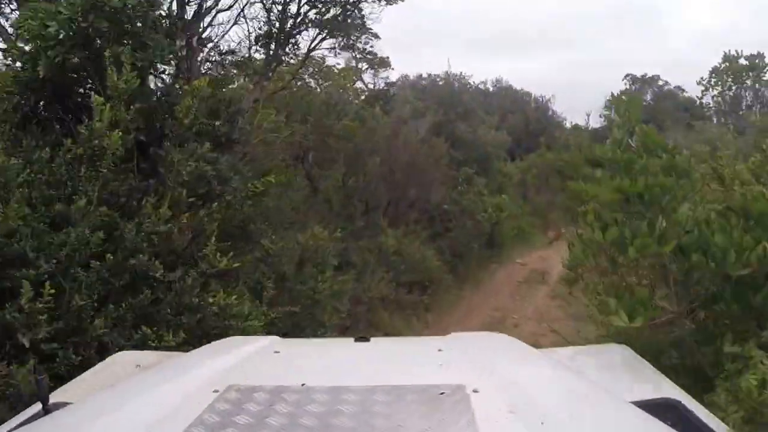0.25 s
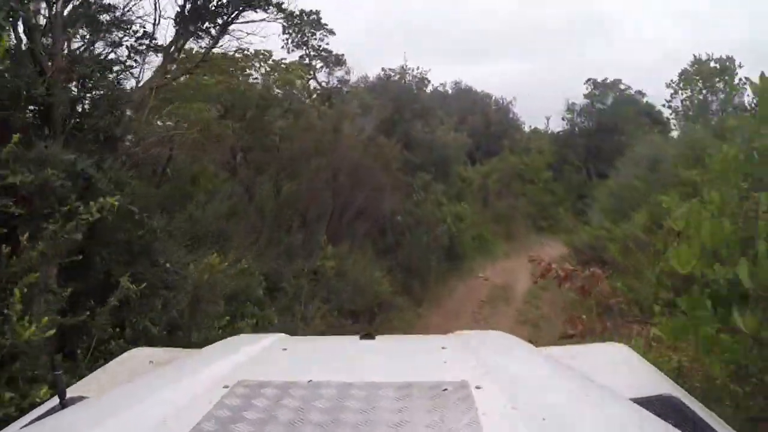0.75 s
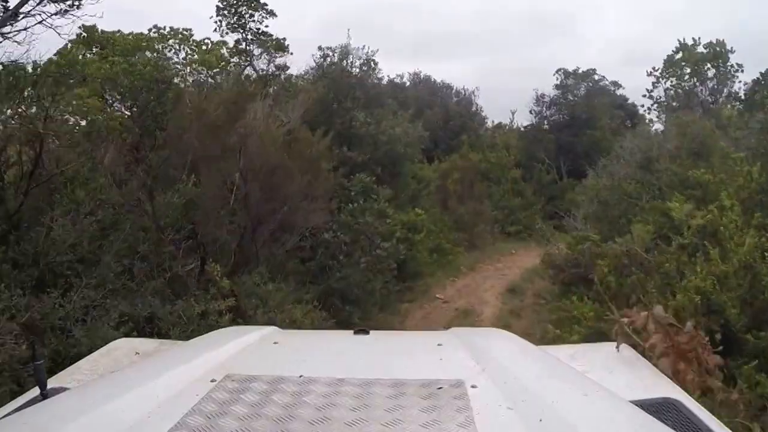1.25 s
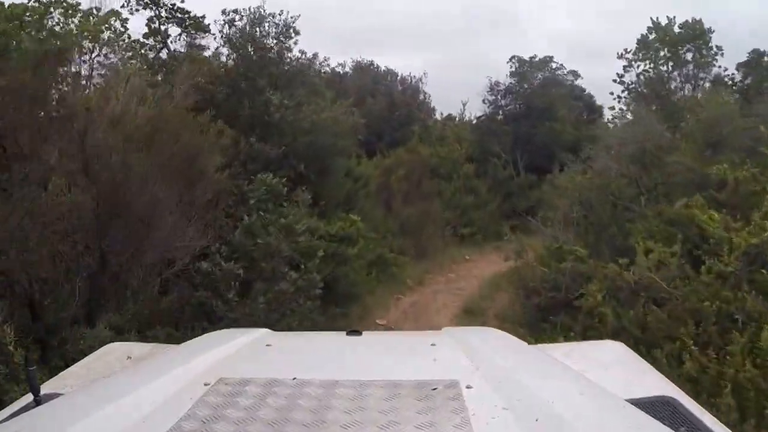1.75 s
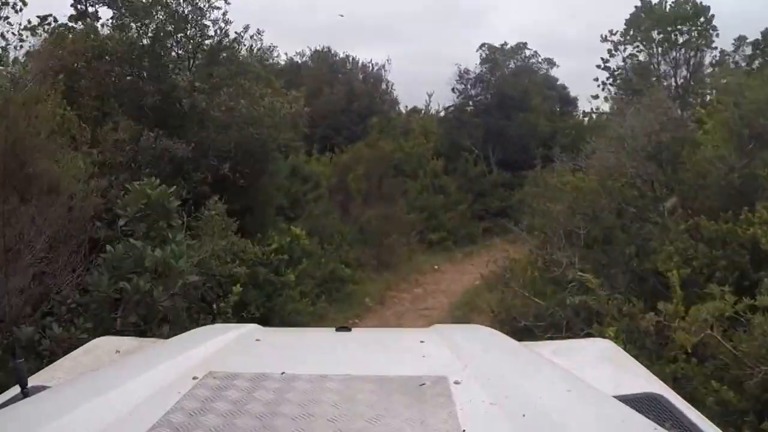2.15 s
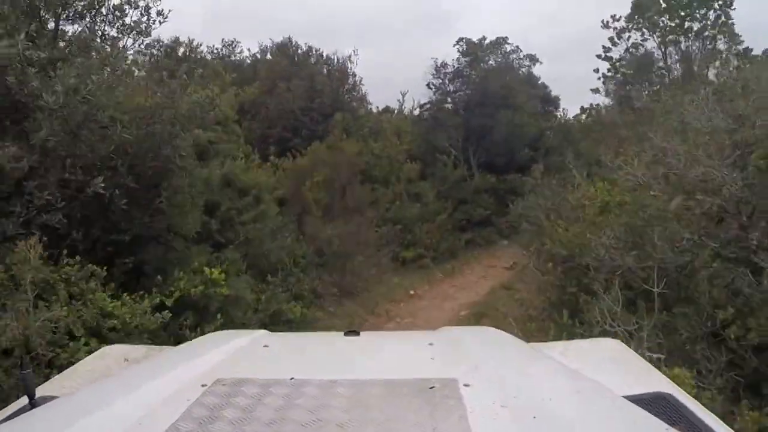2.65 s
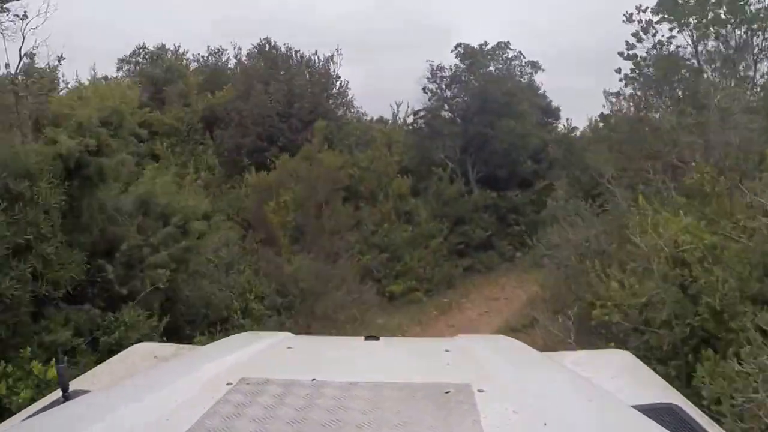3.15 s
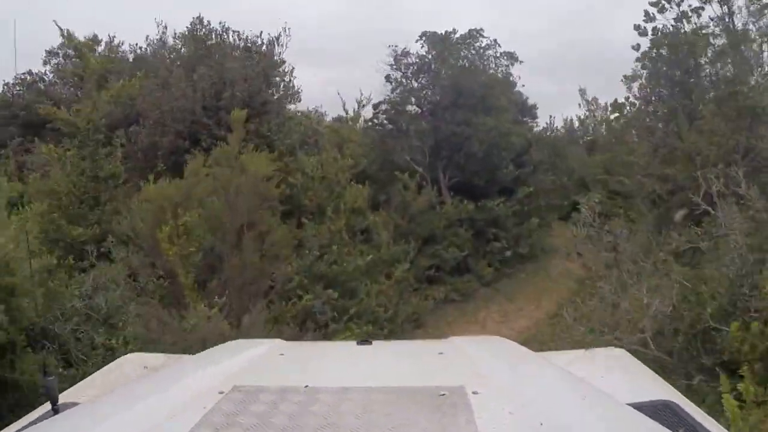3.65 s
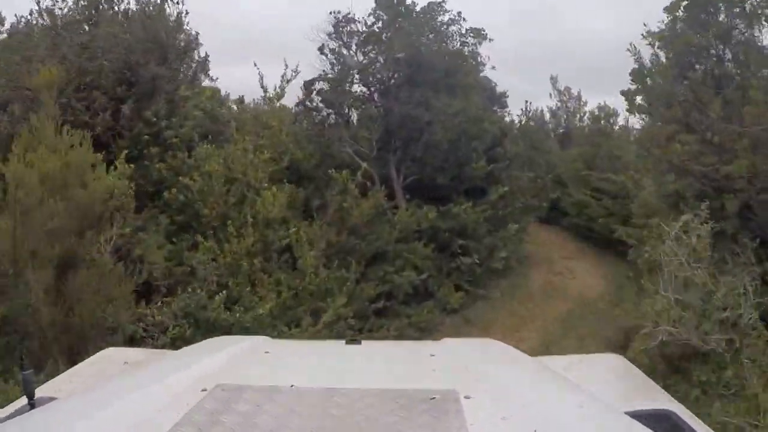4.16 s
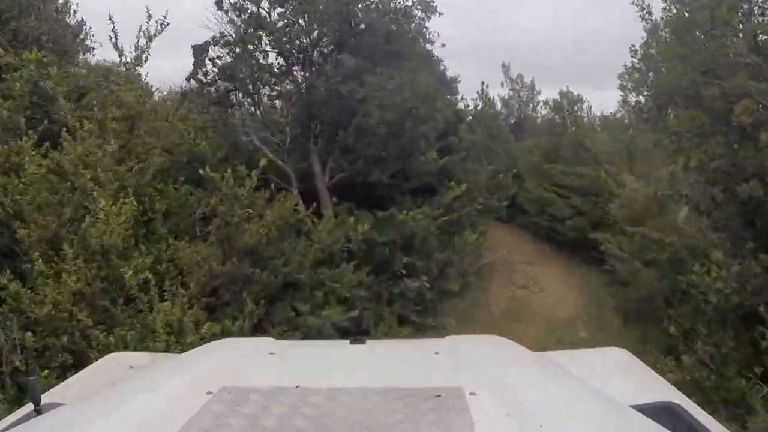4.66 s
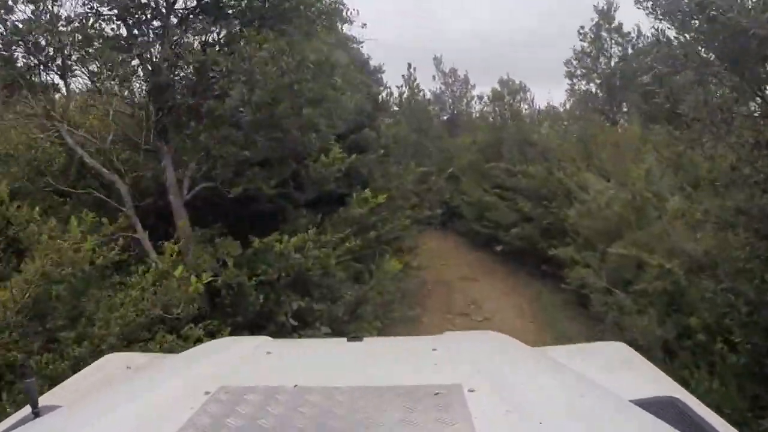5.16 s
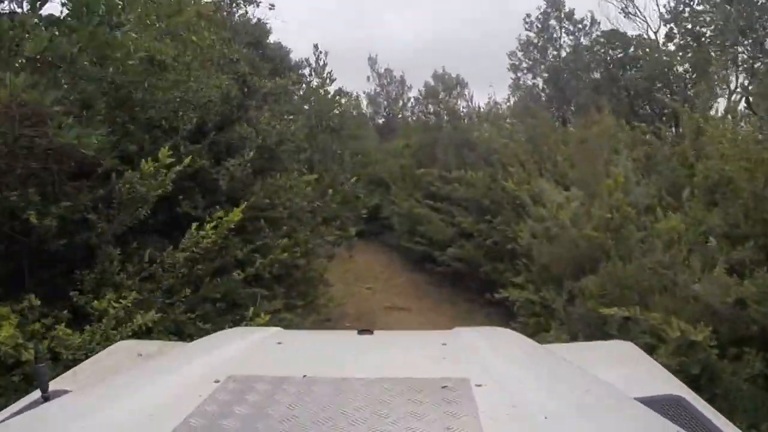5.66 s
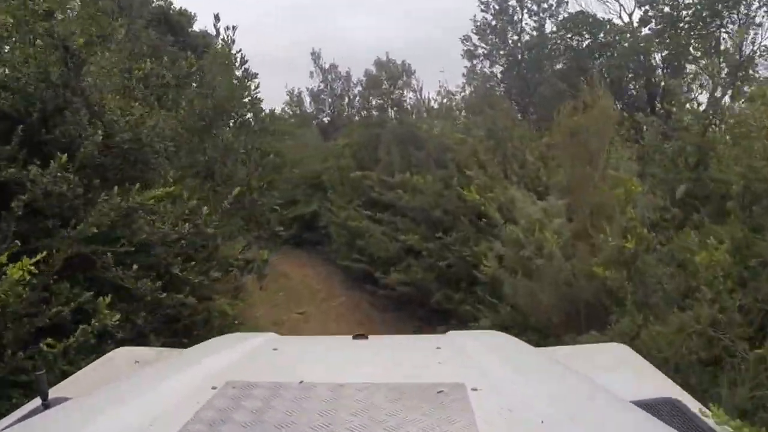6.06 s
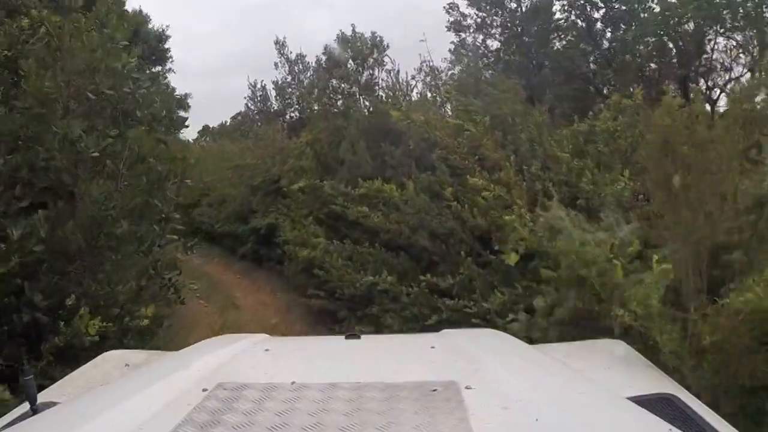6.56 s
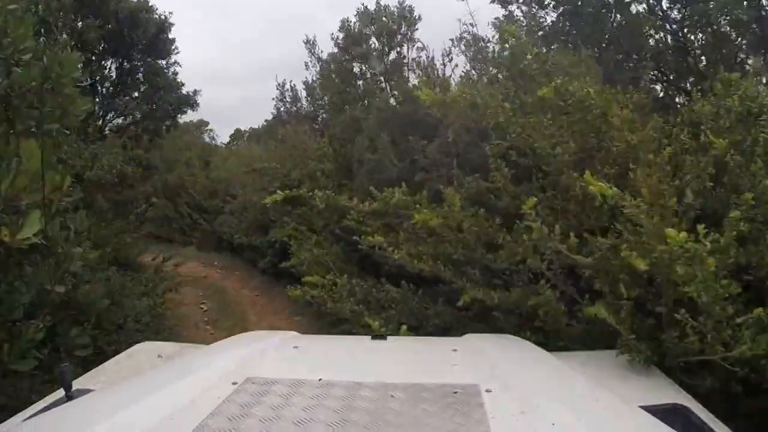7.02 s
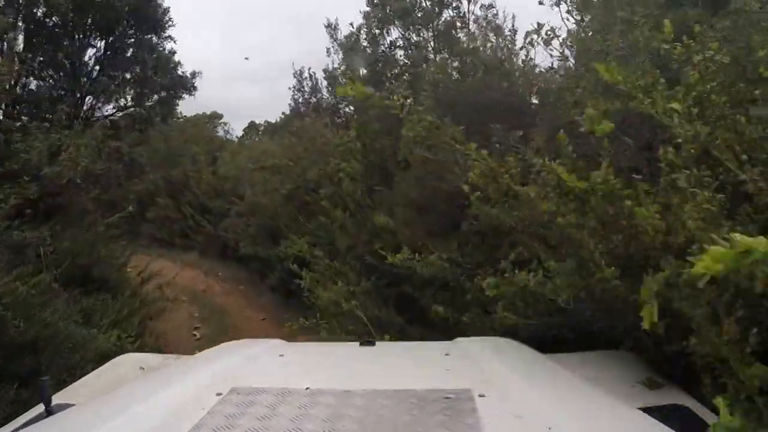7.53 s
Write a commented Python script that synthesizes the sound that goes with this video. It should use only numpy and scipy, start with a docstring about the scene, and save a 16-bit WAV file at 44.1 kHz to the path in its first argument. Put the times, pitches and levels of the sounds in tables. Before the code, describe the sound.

Heard from the outside of a slowly moving off-road vehicle, a dense flurry of twigs cracks against the panels over a low diesel throb. The rough dirt track brings thumps, gritty crunching and a little hollow rattling. A panel gives one short groan, then the foliage eases before more clusters of slaps, leafy scrapes and small squeaks arrive. The engine rises slightly in pitch and settles again toward the end.

```python
"""A diesel four-wheel-drive crawls along an overgrown dirt track, heard from its bodywork.
The engine throbs at orders of its firing rate; the ground drives the body into a rumble, ruts excite
knocks in panels and chassis, and grit crunches under the tyres. Foliage drags along the sides: leaves
crackle, boughs swish past and twigs slap the metal. By stick-slip friction twig tips squeak on the
paint and one heavy bough makes a panel groan."""
import sys
import numpy as np
from scipy import signal
from scipy.fft import rfft, irfft, next_fast_len
from scipy.io import wavfile
from scipy.ndimage import map_coordinates

SR = 44100
rng = np.random.default_rng(int(sys.argv[2]) if len(sys.argv) > 2 else 0)


def to_wav(sig):
    """Store sig (one row per channel, or 1-D mono) as 16-bit WAV at the path in sys.argv[1].

    Samples outside -1..1 are clipped; the rate is SR.
    """
    pcm = np.clip(np.atleast_2d(sig), -1, 1) * 32767
    pcm = np.round(pcm).astype(np.int16)
    wavfile.write(sys.argv[1], SR, pcm.T)  # frames by channels


N = 343539
T = np.arange(N) / SR

# blows from ruts and heavy branches: time_s, level_db, strongest_hz, clatter_s
JOLTS = [(0.046, -17, 285, 0.039), (0.173, -7.5, 298, 0.014), (0.362, -9, 242, 0.017),
         (0.82, -12.5, 330, 0.013), (1.1, -13, 160, .07), (1.485, -10.5, 110, 0.0063),
         (1.56, -11.5, 694, 0.027), (1.676, -18, 850, 0.017), (1.824, -9, 425, 0.0078),
         (1.84, -6, 107, 0.011), (2.155, -17.5, 338.5, 0.014), (2.308, -9.5, 234, 0.0071),
         (2.345, -11, 308, 0.014), (2.495, -10, 268, 0.0073), (2.742, -13.5, 320, 0.0096),
         (2.747, -27, 890, 0.013), (2.822, -11.5, 330, 0.12), (2.855, -19, 810, 0.025),
         (3.002, -12, 398, 0.0034), (3.075, -17, 780, 0.037), (4.165, -10, 293.7, 0.03),
         (4.194, -18, 650, .01), (4.559, -14, 147.9, 0.05), (4.635, -10, 328, 0.03),
         (4.933, -9, 720, 0.028), (5.33, -18.5, 114, 0.024), (5.518, -13.5, 744, 0.01),
         (6.28, -18.5, 146.9, 0.041), (7.194, -15, 794, 0.013)]
# crackle of the foliage pressing on the sides: time_s, level_db
BRUSH = [(0.0, -24.5), (0.12, -32), (0.26, -33), (0.4, -30), (0.49, -28), (0.82, -30.5), (1.15, -35.5),
         (1.3, -34), (1.43, -27.5), (1.51, -33), (1.72, -40), (1.82, -42.5), (2.08, -43.5), (2.23, -38),
         (2.29, -40), (2.52, -40.5), (2.6, -49), (2.82, -39), (2.94, -50), (3.22, -50.5), (3.4, -47),
         (3.66, -35), (3.82, -41.5), (4.06, -37.5), (4.32, -41.5), (4.51, -37), (4.76, -32.5), (4.89, -37),
         (5.0, -33.5), (5.19, -37.5), (5.72, -39), (6.47, -42), (7.1, -40), (7.35, -45.5), (7.79, -47)]
# spectrum of foliage rubbing on metal: frequency_hz, gain_db
LEAF_SPECTRUM = [(500, -1.5), (1000, -1), (1560, -2.5), (2000, -2), (2850, -2.5), (3500, -5), (5200, -9),
                 (7000, -13.5), (9900, -21), (12000, -25.5), (14200, -31), (15200, -45)]


def engine(firings, load_db):
    """Periodic firing of four cylinders gives wavering orders; a resonance lifts those near it."""
    # engine orders: multiple_of_firing_rate, level_db
    orders = [(1, -1.5), (1.5, -20.5), (2, -16.5), (2.5, -22), (3, -19.5), (4, -21.5), (6, -25), (7, -22)]
    boom_hz, boom_half_width_hz, boom_peak_db = 97, 4.5, 12
    firing_hz = np.gradient(firings) * SR
    tone = 0
    for order, db in orders:
        drift = .4 * np.sqrt(order) * walk(12)
        boom_db = boom_peak_db / (1 + ((order * firing_hz - boom_hz) / boom_half_width_hz) ** 2)
        gain = undb(db + boom_db + 2.52 * walk(11))  # uneven load
        tone = tone + gain * np.sin(2 * np.pi * (order * firings + rng.random()) + drift)
    return unit(tone) * undb(load_db)


def body(drum_db):
    """Forced vibration: the sprung body sways, shudders in dips and drums over stony ground."""
    # spectrum of the body on its springs: frequency_hz, gain_db
    sway_spectrum = [(12, -1), (22, 3), (28, 3.5), (38, -4), (60, 5), (80, -14), (130, -29), (250, -86)]
    # spectral envelope of the drumming panels: frequency_hz, gain_db
    drum_spectrum = [(60, -21), (80, -6.5), (103, 0.5), (144, -0.5), (180, -4.5), (245, -7), (300, -3),
                     (365, -7.5), (420, -13.5), (490, -16.5), (570, -23), (900, -60)]
    # lurches through dips: time_s, level_db
    lurches = [(2.45, -17.5), (3.75, -26), (4.22, -19), (4.6, -15), (5.38, -11.5), (6.5, -18)]
    sway = unit(shape(rng.standard_normal(N), lambda f: colour(f, sway_spectrum)))
    shudder_hz = 22.7 * (1 + .062 * walk(5.2))
    shudder = unit(np.sin(2 * np.pi * np.cumsum(shudder_hz) / SR))
    shudder_db = swelling(-27.5, lurches, half_s=.19)
    stones = pings(rate=240, low_hz=70, high_hz=560, cycles=7, spread_db=1.5)
    drum = unit(shape(stones, lambda f: colour(f, drum_spectrum) * np.sqrt(f)))
    return sway * undb(-19.5) + shudder * undb(shudder_db) + drum * undb(drum_db)


def jolts():
    """Modal response to a cushioned blow: where it lands decides which modes of the body ring."""
    # modes of body and chassis: frequency_hz, width_hz, gain_db
    modes = [(113, 10.7, 13), (147, 12.5, 12), (209.4, 7.7, 6), (298.7, 11.7, 2), (366.7, 16.5, -2),
             (490, 33, -2), (674, 45, -12.5), (770, 23, -13.5), (940, 69, -6), (1340, 160, -4.5)]
    out, t = np.zeros(N), T[:SR // 2]
    for s, db, hz, clatter_s in JOLTS:
        force = .17 * rng.standard_normal(len(t)) * np.exp(-t / clatter_s) * min(clatter_s / .027, 1)
        force[0] += 2.2  # the blow itself, ahead of its clatter
        knock = shape(force, lambda f: ring(f, modes) * ring(f, [(hz, hz * .18, 0)]) / (1 + 1j * f / hz))
        add(out, s, knock / np.abs(knock).max() * undb(db + .5))
    return out


def running_gear(firings, grit_db):
    """Impact noise: grit under the tyres, diesel clatter once a firing, and loose fittings rattling."""
    # spectrum of grit and clatter: frequency_hz, gain_db
    grit_spectrum = [(200, -6), (400, 6.5), (550, -1), (650, 3.5), (900, -0.5), (1150, -3), (1500, -3.5),
                     (2250, -24.5), (3600, -21.5), (6000, -48), (10000, -33.5), (14500, -50)]
    # bouts of hollow rattling over rough stretches: peak_s, level_db
    bouts = [(0.85, -38), (1.18, -31), (1.45, -35), (1.66, -25)]
    grit = smear(grains(rate=270, spread_db=2.5), decay_s=.0078)
    clatter = unit(np.exp(-(firings % 1) / .68) * rng.standard_normal(N))
    hiss = unit(shape(grit + undb(-9.5) * clatter, lambda f: colour(f, grit_spectrum)))
    rattle = pings(rate=150, low_hz=430.4, high_hz=1076.5, cycles=14, spread_db=4)
    return hiss * undb(grit_db + 1) + rattle * undb(swelling(grit_db - 6.5, bouts, half_s=.086))


def foliage():
    """Friction as many tiny impacts: stems crackle, leaves hiss, whole boughs swell and slip off."""
    # soft sprigs stroking the paint: peak_s, level_db
    sprigs = [(0.36, -37.5), (1.7, -49), (4.17, -44), (4.81, -48), (5.66, -44), (7.26, -45)]
    # leafy boughs sweeping past: peak_s, level_db, half_length_s
    boughs = [(0.115, -27.5, .011), (1.41, -33, 0.024), (2.42, -40, 0.033), (2.538, -34, 0.011),
              (2.66, -32, 0.015), (2.763, -27, 0.01), (2.868, -34, 0.0078), (3.082, -24.5, 0.017),
              (4.735, -31.5, 0.023), (5.796, -26, 0.01), (7.422, -30.5, 0.016)]
    brush_db, = curves(BRUSH)
    leaf_db = swelling(brush_db - 7.5, sprigs, half_s=.19)
    ticks = smear(grains(rate=260, spread_db=3.8), decay_s=.008)
    contact = unit(on_panel(ticks + undb(-2.5) * grains(rate=7000, spread_db=-3), ring_db=-49))
    stems = pings(rate=220, low_hz=1520, high_hz=12920, cycles=7, spread_db=2.5)
    drag = contact + undb(-6) * unit(on_panel(stems, ring_db=-22))
    leaves = shape(drag, lambda f: f ** 4 / (f ** 4 + 5500 ** 4))
    catch_db = 1.3 * walk(40)  # stems and leaves catch and let go together, in fits
    crackle = unit(drag - leaves) * undb(brush_db + 1.5 + catch_db + 1.2 * walk(60))
    hiss = unit(leaves) * undb(leaf_db - 4 + catch_db + 1.5 * walk(35))
    sweep = sum(undb(db) * np.exp(1 - np.hypot(1, (T - s) * 1.04 / half)) for s, db, half in boughs)
    brushing = on_panel(grains(rate=4500, spread_db=.5), ring_db=-24)
    swish = unit(shape(brushing, lambda f: np.hypot(1, f / 6000)))
    return crackle + hiss + swish * sweep


def on_panel(x, ring_db):
    """Source and filter: contact noise of foliage takes on the resonances of the metal it touches."""
    # modes of the thin side panels: frequency_hz, width_hz, gain_db
    modes = [(2970, 50, 11), (3740, 180, 6), (5070, 330, 1)]
    return shape(x, lambda f: colour(f, LEAF_SPECTRUM) * (1 + undb(ring_db) * ring(f, modes)))


def twigs():
    """Impact and free decay: a twig cracks on the panel, its wood rings and its leaves crunch."""
    # stout twigs slapping the panels: start_s, level_db, brightest_hz, crunch_decay_s
    slaps = [(0.039, -10, 1880, 0.015), (0.08, -10, 2290, 0.015), (0.102, -16, 2300, .014),
             (0.121, -14.5, 6950, 0.015), (0.21, -16, 2220, 0.0085), (0.277, -13.5, 6500, 0.0046),
             (0.31, -18.5, 4200, .008), (0.455, -11, 2200, 0.0033), (0.528, -13.5, 2900, 0.093),
             (0.585, -12, 2990, 0.017), (0.637, -13, 2060, 0.0063), (0.646, -12.5, 2010, 0.0066),
             (0.665, -12.5, 1890, 0.015), (0.729, -9.5, 2470, 0.014), (0.906, -13.5, 2950, 0.048),
             (1.341, -17, 3600, 0.017), (1.543, -19.5, 2700, 0.054), (1.571, -21, 1802, 0.013),
             (1.677, -23.5, 3000, 0.02), (1.825, -19, 2820, 0.03), (1.868, -23, 3224, .008),
             (2.028, -25, 2300, 0.041), (2.135, -14, 3500, 0.049), (2.176, -20, 6000, .006),
             (2.196, -12, 4085, 0.008), (2.218, -22.5, 2320, 0.046), (2.484, -26, 2420, 0.042),
             (2.792, -19, 2140, 0.0044), (3.446, -27, 3120, 0.026), (3.627, -14.5, 3333, 0.016),
             (3.675, -24, 4517, 0.0085), (3.767, -16.5, 5400, 0.022), (3.854, -18.5, 3080, 0.023),
             (4.62, -15, 2670, 0.052), (4.647, -14, 5000, 0.011), (4.705, -11.5, 5600, 0.027),
             (4.722, -12, 3370, 0.025), (4.838, -17.5, 1497, 0.0077), (4.92, -15, 3870, .005),
             (4.93, -12, 2470, 0.027), (5.06, -25.5, 5984, 0.032), (5.14, -18, 2946, 0.0076),
             (5.243, -22, 2236, 0.035), (5.318, -26, 2650, 0.0072), (5.82, -22, 5050, .005),
             (5.884, -19.5, 3070, 0.022), (6.274, -20, 3030, 0.0055), (7.079, -27, 2980, 0.011),
             (7.195, -10, 4797, 0.029), (7.233, -17.5, 4523, 0.037), (7.267, -15, 4230, 0.018),
             (7.415, -17.5, 3190, 0.027), (7.439, -18, 3980, 0.024), (7.634, -23, 2347, 0.012),
             (7.657, -22, 3174, 0.016)]
    rise_s, crack_s = .0008, .008
    out, t = np.zeros(N), T[:SR // 5]
    for s, db, hz, decay_s in slaps + flicks():
        chatter = rng.standard_normal(len(t))
        chatter *= undb(1.5 * np.repeat(rng.standard_normal(len(t)), 64)[:len(t)])
        crack = shape(chatter, lambda f: ring(f, [(hz, hz * 1.15, 0)]) ** 2
                      / np.hypot(1, (f / 11000) ** 2))
        crack = unit(crack) * np.exp(-(t / crack_s) ** 2)
        contact = on_panel(chatter, ring_db=-9)
        crunch = shape(contact, lambda f: .1 + np.abs(ring(f, [(hz, hz * 1.4, 0)])))
        crunch = unit(crunch) * np.exp(-t / decay_s)
        weak_modes_hz = hz * 2 ** rng.uniform(-1.3, .2, (4, 1))
        wood = np.sin(2 * np.pi * hz * t) + .7 * np.sin(2 * np.pi * weak_modes_hz * t).sum(0)
        wood *= np.exp(-t * hz / 18)
        blow = (.7 * crack + .58 * crunch + .5 * wood) * (1 - np.exp(-t / rise_s))
        add(out, s, blow * undb(db - 7))
    return out


def flicks(rate=9, above_brush_db=3, scatter_db=2, centre_hz=3200, decay_s=.005):
    """Random impacts of thin twigs, as hard as the foliage presses; rows for twigs()."""
    rows = []
    for when, strength, pitch in rng.random((int(rate * N / SR), 3)):
        s = when * N / SR
        db = np.interp(s, *np.transpose(BRUSH)) + above_brush_db + scatter_db * (2 * strength - 1)
        rows.append((s, db, centre_hz * 2 ** (pitch - .5), decay_s))
    return rows


def groan(peak_s=2.908, rise_s=.044, fall_s=.052, pitch_hz=358.6, slip_s=.008):
    """Stick-slip excitation: a heavy bough keeps one panel mode singing, a little unsteadily."""
    hz = pitch_hz * (1 + .031 * walk(60))
    tone = unit(np.sin(2 * np.pi * np.cumsum(hz) / SR))
    since = T - peak_s
    push = np.exp(-np.maximum(-since / rise_s, since / fall_s))
    slip = undb(7.5) * np.exp(-(since / slip_s) ** 2)  # the bough lets go at the hardest push
    return tone * (push + slip) * undb(-20 + 1.67 * walk(70))


def squeaks():
    """Stick-slip oscillation of a twig tip on paint: a thin, broken whistle bends inside a dry rasp."""
    # twig tips sliding: start_s, length_s, pitch_hz, bend_share, level_db, overtone_step_db
    slides = [(0.042, .07, 10650, -.02, -48, -15), (0.874, .026, 4700, 0.026, -32, -15),
              (0.958, 0.047, 6650, 0.048, -36.5, -20), (1.024, 0.052, 7250, 0.028, -35, -22),
              (1.06, 0.046, 8200, .05, -43, -20), (1.131, 0.025, 7130, 0.011, -30, -20),
              (1.335, 0.024, 3010, -.01, -20.5, -20), (1.375, 0.087, 3040, .03, -29.5, -10),
              (3.565, 0.055, 4350, -.05, -40, -9), (3.676, .04, 4510, .04, -39, -12),
              (4.056, .07, 12640, .01, -48, -6), (4.118, 0.043, 4410, -0.063, -36, -9),
              (4.185, 0.075, 4370, -.04, -32, -4.5), (4.951, 0.18, 12780, -.03, -51, -15),
              (4.986, 0.015, 4000, -.04, -29.5, -16), (6.125, 0.066, 3505, .01, -45, -13),
              (6.4, 0.02, 3500, 0.025, -41, -12), (6.68, 0.038, 10870, .02, -51, -13)]
    # spectrum of the friction noise: frequency_hz, gain_db
    rasp_spectrum = [(1000, -25), (4000, 0), (7000, -4), (13000, -10), (15000, -25)]
    out = np.zeros(N)
    grip = undb(3 * walk(220) + 3.2 * walk(50))
    waver = .024 * walk(2600) + .013 * walk(140)
    rasp = unit(shape(rng.standard_normal(N), lambda f: colour(f, rasp_spectrum)))
    for s, length_s, hz, bend, db, step_db in slides + chirps():
        here = slice(int(s * SR), int((s + length_s) * SR))
        progress = (T[here] - s) / length_s
        phase = 2 * np.pi * np.cumsum(hz * (1 + bend * (progress - .5) + waver[here])) / SR
        tone = sum(undb(step_db * (k - 2.5)) * np.sin(k * phase) for k in range(1, 4) if k * hz < 13400)
        scrape = tone + 1.3 * undb(step_db) * rasp[here]
        arch = np.sqrt(np.abs(np.sin(np.pi * progress)))
        add(out, s, unit(scrape * grip[here] * arch) * undb(db - 3.5))
    return out


def chirps(start_s=5.0, end_s=7.1, rate=7, length_s=.018, low_hz=1800, high_hz=9000, step_db=-15):
    """Brief random stick-slip of dry tips in the thicket, the high ones fainter; rows for squeaks()."""
    rows = []
    for when, pitch, bend in rng.random((int(rate * (end_s - start_s)), 3)):
        s = start_s + when * (end_s - start_s)
        hz = low_hz * (high_hz / low_hz) ** pitch
        db = np.interp(s, *np.transpose(BRUSH)) + 3 + 20 * np.log10(colour(hz, LEAF_SPECTRUM))
        rows.append((s, length_s, hz, .05 * (2 * bend - 1), db, step_db))
    return rows


def reflections(x, echo_db, count):
    """Comb filtering: bonnet, glass and wings return weak copies that interfere with the direct sound."""
    out = x.copy()
    for delay_s, sign in zip(rng.uniform(.000967, .011, count), rng.choice([-1, 1], count)):
        add(out, delay_s, sign * undb(echo_db) * x)
    return out / np.sqrt(1 + count * undb(2 * echo_db))


def pings(rate, low_hz, high_hz, cycles, spread_db):
    """Damped oscillators: small rough things struck at random, rate a second, each with its own note."""
    out = np.zeros(N)
    for when, place, size in rng.random((int(rate * N / SR), 3)):
        hz = low_hz * (high_hz / low_hz) ** place
        turns = T[:int(5 * cycles * SR / hz)] * hz
        stray = .065 * np.sqrt(hz / SR) * np.cumsum(rng.standard_normal(len(turns)))
        swing = np.sin(2 * np.pi * (turns + stray)) * np.exp(-turns / cycles)
        add(out, when * N / SR, swing * undb(-spread_db * np.log(size + .043)) * np.sqrt(hz))
    return unit(out)


def grains(rate, spread_db):
    """Shot noise: random tiny impacts of uneven size, rate a second."""
    size = undb(spread_db * np.minimum(rng.exponential(size=N), 5))
    return unit((rng.random(N) < rate / SR) * size * rng.choice([-1, 1], N))


def smear(clicks, decay_s):
    """Exponential decay of energy turns each impact into a short burst of noise."""
    retained = np.exp(-1 / (decay_s * SR))
    energy = signal.lfilter([1], [1, -retained], clicks ** 2)
    return unit(np.sqrt(energy) * rng.standard_normal(N))


def shaken(steady_db, share_db, rise_s=.0032, decay_s=.033):
    """Powers add: a level in dB leaps with each jolt and settles again."""
    power = undb(2 * steady_db)
    settle = (1 - np.exp(-T[:SR] / rise_s)) * np.exp(-T[:SR] / decay_s)
    for s, db, _, _ in JOLTS:
        add(power, s, (undb(db + share_db) * settle) ** 2)
    return 10 * np.log10(power)


def swelling(steady_db, swells, half_s):
    """Powers add: a level in dB with Gaussian swells (peak_s, level_db) on top."""
    power = sum(undb(2 * db) * np.exp(-((T - s) / half_s) ** 2) for s, db in swells)
    return 10 * np.log10(undb(2 * steady_db) + power)


def ring(f, modes):
    """Modal superposition: causal response of resonances (frequency_hz, width_hz, gain_db)."""
    return sum((-1) ** k * undb(db) / (1 + 1j * (f * f - hz * hz) / (f * width))
               for k, (hz, width, db) in enumerate(modes))


def colour(f, points):
    """Gain of a spectrum (frequency_hz, gain_db), interpolated over log frequency."""
    hz, db = np.transpose(points)
    return undb(np.interp(np.log(f), np.log(hz), db))


def shape(x, response):
    """Linear filtering: multiply the spectrum of x by a function of frequency."""
    size = next_fast_len(len(x) + 4096)
    f = np.maximum(np.arange(size // 2 + 1) * SR / size, 1)
    return irfft(rfft(x, size) * response(f), size)[:len(x)]


def walk(rate):
    """Random wander through rate knots a second, with a spread near 1."""
    knots = rng.standard_normal(int(8 * rate) + 4)
    return map_coordinates(knots, [T * rate], order=1) * 1.39


def curves(table):
    """Each column of a control table, interpolated to every sample."""
    s, *columns = np.transpose(table)
    return [np.interp(T, s, c) for c in columns]


def add(out, s, x):
    """Superpose x on out from time s on."""
    i = max(int(s * SR), 0)
    out[i:i + len(x)] += x[:max(N - i, 0)]


def undb(db):
    """Decibels to gain."""
    return 10 ** (np.asarray(db) / 20)


def unit(x):
    """Scale to rms 1."""
    return x / np.sqrt(np.mean(x ** 2) + 1e-18)


def scene():
    """Superposition of engine, body, running gear and foliage at one point close to them all."""
    # engine speed and load: time_s, firing_hz, level_db
    throttle = [(0.0, 40.65, -11), (0.2, 36.37, -19), (0.55, 35.53, -17.5), (0.9, 35.8, -18.5),
                (1.0, 41.25, -12.5), (1.3, 44.2, -12.5), (1.47, 43.84, -21.5), (1.75, 43.27, -14.5),
                (2.02, 45.68, -23.5), (2.25, 46.06, -15.5), (2.7, 47.6, -18.5), (3.12, 49.26, -30),
                (3.4, 49.73, -21), (3.95, 50.78, -18.5), (4.42, 51.16, -23), (4.8, 52.74, -20.5),
                (5.35, 52.2, -14.5), (5.68, 50.1, -23.5), (6.3, 49.94, -19.5), (6.75, 46.63, -18),
                (7.15, 44.28, -17.5), (7.4, 43.77, -29), (7.79, 44, -30)]
    # roughness of the track, as drumming of the body: time_s, level_db
    roughness = [(0.0, -16), (0.26, -22), (0.65, -23), (1.15, -20.5), (1.4, -22), (1.76, -24.5),
                 (1.97, -25), (2.3, -27), (2.55, -23.5), (2.68, -30), (2.82, -24), (2.97, -24.5),
                 (3.18, -33), (3.36, -27), (3.62, -24), (3.82, -27), (4.32, -24.5), (4.62, -22.5),
                 (4.8, -25.5), (5.44, -27.5), (5.68, -20.5), (6.05, -26.5), (6.35, -23.5), (6.9, -25),
                 (7.35, -24.5), (7.79, -30)]
    usual_ground_db, usual_brush_db = -24, -40.5
    firing_hz, load_db = curves(throttle)
    firings = np.cumsum(firing_hz) / SR
    ground_db = curves(roughness)[0] + .8 * walk(9)  # stony patches come and go
    brush_db, = curves(BRUSH)
    drum_db = shaken(ground_db + 1, share_db=-6.5)
    # undergrowth dragging under the floor adds to the grit
    rolling_db = -33 + .86 * (ground_db - usual_ground_db) + .14 * (brush_db - usual_brush_db)
    grit_db = shaken(rolling_db, share_db=-17.5)
    vehicle = engine(firings, load_db) + body(drum_db) + jolts() + groan()
    outside = reflections(running_gear(firings, grit_db) + foliage() + squeaks(), echo_db=-20.5, count=6)
    return (vehicle + outside + twigs())[None]


def record(dry):
    """Soft saturation rounds the highest peaks; a steep low-pass filter cuts the top."""
    cutoff_hz = 15000
    rounded = dry / (1 + dry ** 6) ** (1 / 6)
    return signal.sosfilt(signal.ellip(10, .2, 80, cutoff_hz, fs=SR, output="sos"), rounded)


dry = scene()
out = record(dry)
to_wav(out)
```